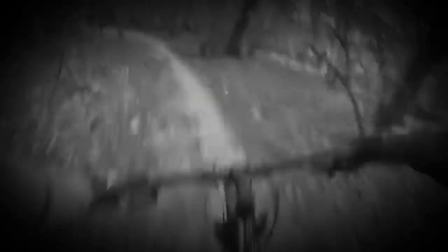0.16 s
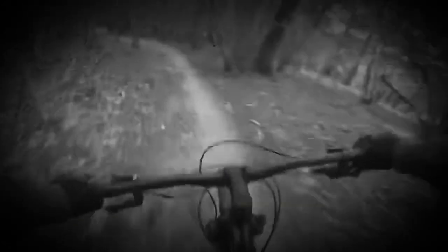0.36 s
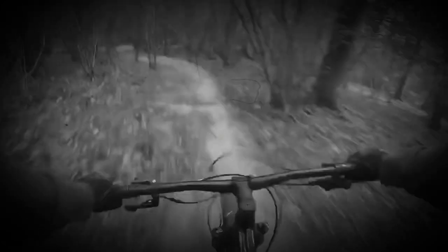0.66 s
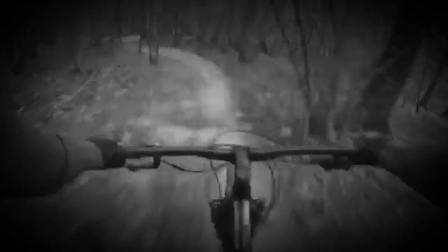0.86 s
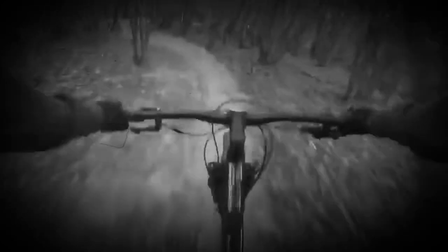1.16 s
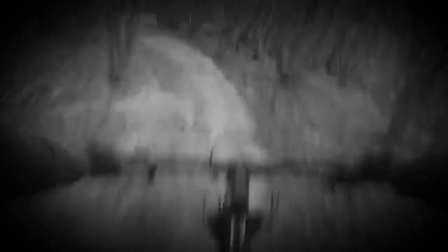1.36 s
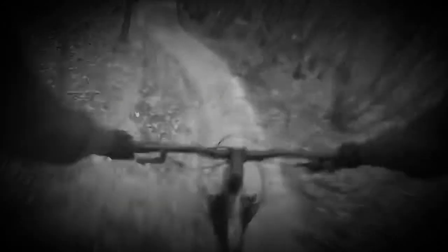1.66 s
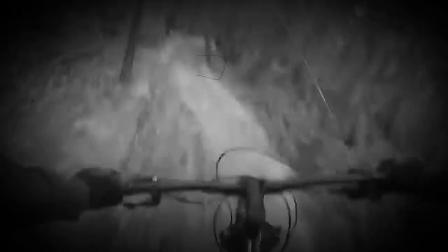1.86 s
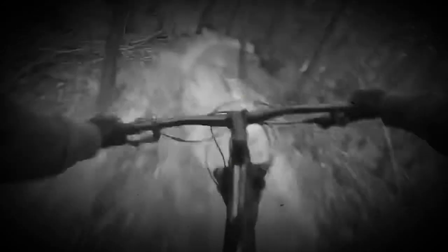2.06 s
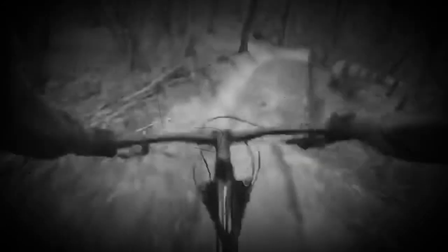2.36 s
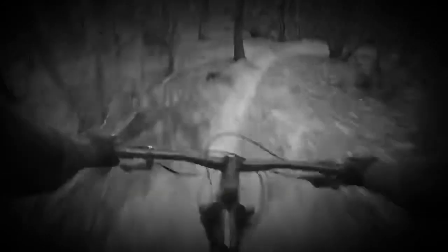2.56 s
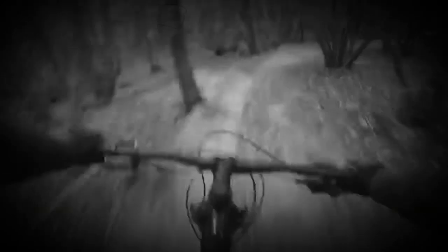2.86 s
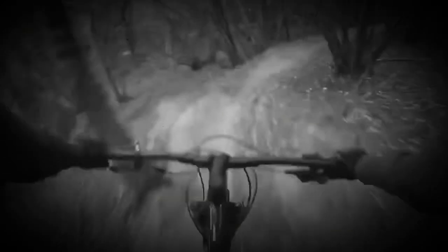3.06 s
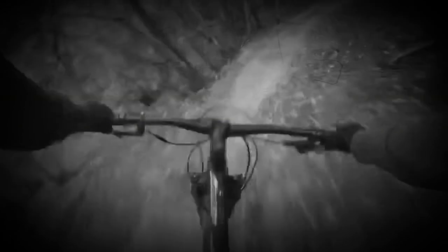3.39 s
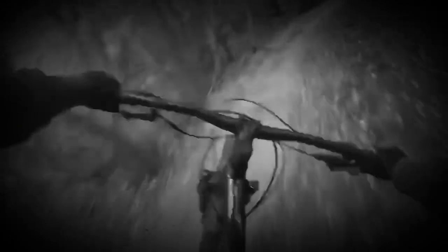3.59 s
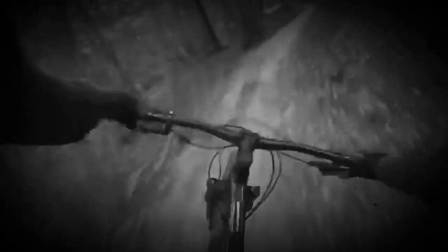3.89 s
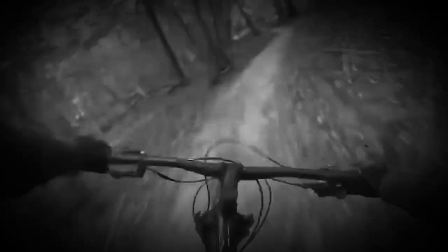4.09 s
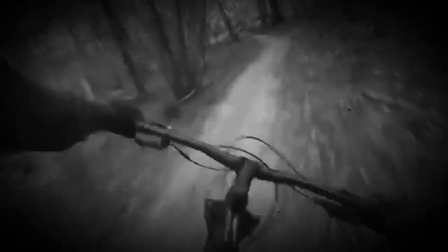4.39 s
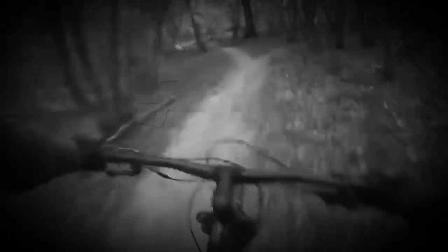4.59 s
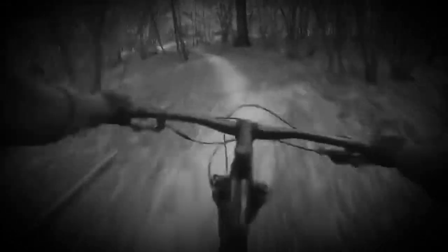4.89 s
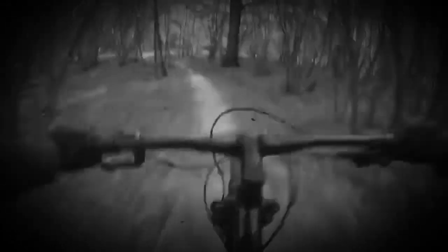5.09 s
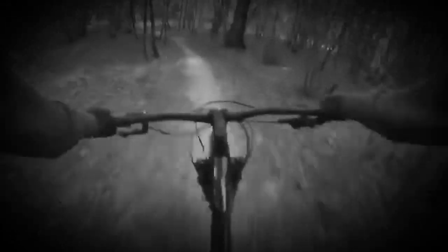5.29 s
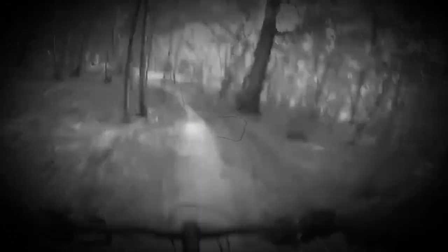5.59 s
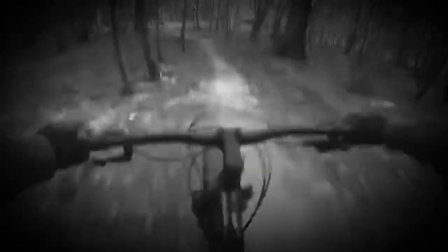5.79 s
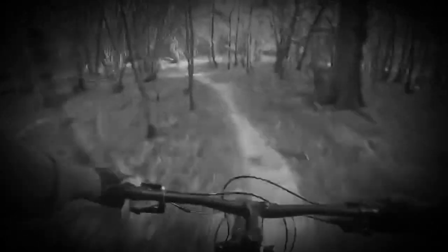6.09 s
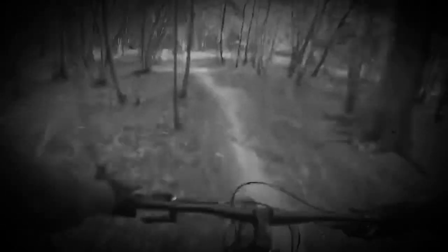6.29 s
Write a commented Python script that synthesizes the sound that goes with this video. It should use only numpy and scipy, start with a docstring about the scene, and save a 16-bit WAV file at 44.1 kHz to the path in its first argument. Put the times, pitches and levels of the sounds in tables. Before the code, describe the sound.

Mounted on a mountain bike outdoors, the microphone catches hard hollow plastic blows at point-blank range, with no echo. They come in uneven clusters, several a second, with brief lulls around the middle. Faint gritty tyre noise, dry leaf hiss and deep shaking run below, swelling on bumps. Late on, a thump, loud double click and harsh grating slip lead into a near-silent hop, then softer landing clacks.

```python
"""A camera rattles in its plastic mount, right at the microphone, on a mountain bike rolling fast down a bumpy
dirt trail. Decaying modes ring the knocks, clicks and hollow clacks; late in the ride the mount slips and
scrapes in shaped grains, then the bike flies for nearly half a second. Below it the tyres hiss and crackle in
noise and grains, louder on bumps and quieter in the air, and low noise and damped pushes carry the rumble."""
import sys
import numpy as np
from scipy import signal
from scipy.fft import rfft, irfft, next_fast_len
from scipy.io import wavfile
from scipy.ndimage import uniform_filter1d, map_coordinates

SR = 44100
rng = np.random.default_rng(int(sys.argv[2]) if len(sys.argv) > 2 else 0)


def wav_out(sig):
    """Save sig, one row per channel (or a flat mono array), as 16-bit PCM at SR to the path in sys.argv[1]."""
    wavfile.write(sys.argv[1], SR, np.round(np.clip(np.atleast_2d(sig).T, -1, 1) * 32767).astype(np.int16))


N = 284430  # length in samples


def amp(db):
    """Decibels to gain."""
    return 10 ** (np.asarray(db) / 20)


def unit(x):
    """Scaled to rms 1."""
    return x / np.sqrt(np.mean(x ** 2) + 1e-20)


def curves(rows):
    """One value per sample for each column after the time, in straight lines between rows."""
    seconds, *columns = np.transpose(rows)
    return [np.interp(np.arange(N) / SR, seconds, column) for column in columns]


def wobble(rate):
    """A smooth random curve through rate knots a second."""
    knots = rng.standard_normal(int(N * rate / SR) + 4)
    return map_coordinates(knots, [np.arange(N) * rate / SR])


def swell(middle, length):
    """A smooth rise to 1 and fall; it stands at 1/e half a length either side of the middle."""
    t = np.arange(N) / SR
    return np.exp(-np.minimum((2 * (t - middle) / length) ** 2, 50))


def filtered(x, response):
    """x times a response of frequency."""
    size = next_fast_len(N + SR // 2)
    hz = np.fft.rfftfreq(size, 1 / SR)
    return irfft(rfft(x, size) * response(hz), size)[:N]


def coloured(x, spectrum):
    """x through (Hz, dB) points joined on a log frequency axis, at rms 1."""
    f, db = np.transpose(spectrum)
    return unit(filtered(x, lambda hz: amp(np.interp(np.log(hz + 1), np.log(f), db))))


def noise(spectrum):
    """Coloured noise of rms 1."""
    return coloured(rng.standard_normal(N), spectrum)


def grains(rate):
    """Tiny impacts at random moments, rate a second on average, of unequal size, at rms 1."""
    size_db = 2.5 * rng.standard_normal(N)
    struck = rng.random(N) < rate / SR
    return unit(struck * rng.standard_normal(N) * amp(size_db))


# The camera drops onto its seat. Each row: start in seconds, level in dB.
KNOCKS = [(0.1035, -26), (0.2183, -12.5), (0.4006, -25), (0.6006, -9), (0.7827, -11.5), (0.9579, -9.5),
          (1.213, -7.5), (1.3405, -11), (1.6396, -6), (1.751, -35.5), (1.9822, -15), (2.138, -15),
          (2.298, -16.5), (2.4392, -17.5), (2.5116, -11.5), (2.6727, -17.5), (2.8395, -13.5), (3.023, -25),
          (3.1047, -19), (3.2701, -19), (3.8604, -29), (4.0379, -24.5), (4.1701, -37), (4.264, -11),
          (4.3487, -7.5), (4.8578, -15), (5.7243, -38), (5.7982, -39), (5.9694, -34.5), (6.2112, -23.5),
          (6.3723, -20.5)]
# The camera hits the opposite stop. Each row: start in seconds, level in dB, hardness in dB per octave.
CLICKS = [(0.0029, -22, -1), (0.0826, -6.5, 4.5), (0.2105, -9, 3.5), (0.3875, -29, -8.5), (1.0337, -2, 0.5),
          (1.2874, -10.5, 2), (1.6968, -6.5, 5), (1.9111, -14, 1.8), (2.0784, -8, -3.5), (2.0852, -9, -5),
          (2.2431, -6, -0.1), (2.3741, -8, -0.2), (2.5989, -19.5, -1.7), (4.3401, -18, -7.5),
          (4.6377, -20.5, -4), (4.8957, -5.5, -0.7), (4.9793, -8, -2.5), (5.5865, -2.5, -3.5),
          (5.6055, -1, -1.5)]
# Glancing blows on the case. Each row: start in seconds, level in dB, hardness in dB per octave.
CLACKS = [(0.5781, -14.5, -3.2), (0.6035, -11.5, 4.5), (0.9347, -7.5, -0.5), (1.5921, -6, 1.5),
          (3.1042, -8.5, 0), (3.9254, -19.5, -3), (4.419, -22.5, -5), (4.4974, -28.5, 0.5),
          (5.1375, -24, -1.5), (5.2037, -13, -3), (5.2624, -21.5, -4.5), (5.4366, -35.5, 5),
          (5.4907, -26, -9.5), (5.6222, -10, 0.5), (5.6355, -11.5, 5), (5.684, -11.5, 3),
          (6.2314, -12, -1.8), (6.3518, -19, 0)]
# Resonances of the seat. Each row: frequency in Hz, level in dB, time to fall 60 dB in seconds.
SEAT_MODES = [(137, -2, 0.023), (250, -6, 0.026), (560, -1, 0.033), (746, -8, 0.042), (980, 0, 0.012),
              (1485, -12, 0.017), (1664, -8, 0.021), (2100, -4, 0.008), (2602, -10, 0.017),
              (3019, -12, 0.011), (4085, -13, 0.016), (5698, -18, 0.009), (8532, -24, 0.001)]
# Resonances of the stop. Each row: frequency in Hz, level in dB, time to fall 60 dB in seconds.
STOP_MODES = [(183, -15.5, 0.015), (1098, -13, 0.025), (1308, 1.5, 0.012), (1490, 2.5, 0.0077),
              (2628, -5, 0.011), (2985, -0.5, 0.0027), (4250, -13, 0.0071), (4750, -17.5, 0.01),
              (5740, -18.5, 0.012), (6310, -25.5, 0.0076), (8540, -23, 0.0042), (10800, -33.5, 0.0055)]
# Resonances of the case. Each row: frequency in Hz, level in dB, time to fall 60 dB in seconds.
CASE_MODES = [(280, 0, 0.006), (614, -6, 0.015), (805, -5, 0.009), (1280, -2, 0.011), (1704, -5, 0.011),
              (2047, -3, 0.008), (2810, -2.5, 0.014), (3761, -17, 0.01), (4343, -10, 0.005),
              (5947, -13, 0.007), (8265, -27, 0.004)]
# The steel clamp screw, shaken by each click. Each row: frequency in Hz, level in dB, time to fall 60 dB in seconds.
SCREW_MODES = [(1100, -46, .07), (1486, -44, .09), (1870, -37, .15), (2690, -44, .12)]
# a stronger knock is brighter: dB per octave at 0 dB, and dB per octave for each dB of level
FULL_HARDNESS, HARDNESS_PER_DB = 1.4, 0.1388


def rattle():
    """The camera bangs about in the play of its mount; glancing blows scuff the most."""
    drops = [(s, db, FULL_HARDNESS + HARDNESS_PER_DB * db) for s, db in KNOCKS]
    stop_and_screw = np.vstack([STOP_MODES, SCREW_MODES])
    knocks = blows(drops, SEAT_MODES, scatter_db=1, detune=0.012, scuff=0.27, soft_hz=7100)
    clicks = blows(CLICKS, stop_and_screw, scatter_db=1.3, detune=0.009, scuff=0.28, soft_hz=10100)
    clacks = blows(CLACKS, CASE_MODES, scatter_db=1, detune=0.0053, scuff=0.45, soft_hz=7000)
    return knocks + clicks + clacks


def blows(events, modes, scatter_db, detune, scuff, soft_hz):
    """Every contact rings the part a little differently."""
    out = np.zeros(N + SR)
    for s, db, hardness in events:
        ringing = ring(modes, hardness, scatter_db, detune)
        blow = amp(db) * signal.fftconvolve(ringing, contact(scuff, soft_hz))
        out[round(s * SR):][:len(blow)] += blow
    return out[:N]


def ring(modes, hardness, scatter_db, detune):
    """Decaying sines of one struck part; a harder blow favours the high modes."""
    hz, db, t60 = np.transpose(modes)[:, :, None]
    t = np.arange(SR // 6) / SR
    size, shift = rng.standard_normal((2, len(modes), 1))
    # neighbouring modes reach the microphone in opposite phase
    polarity = (-1) ** np.arange(len(modes))[:, None]
    octaves = np.log2(np.maximum(hz, 500) / 1000)  # from 1 kHz, no lower than 500 Hz
    level = polarity * amp(db + hardness * octaves + scatter_db * size)
    decay = np.exp(-np.log(1000) * t / t60)
    tones = np.sin(2 * np.pi * hz * (1 + detune * shift) * t)
    return np.sum(level * decay * tones, axis=0)


def contact(scuff, soft_hz):
    """The force of one contact: a tap rounded by the soft plastic, and a scuff as the faces settle."""
    t = np.arange(SR // 100) / SR
    grind = rng.standard_normal(len(t)) * t * np.exp(-t / 0.00093)
    force = (t == 0) + scuff * grind / np.linalg.norm(grind)
    rounding = signal.butter(2, soft_hz, fs=SR)
    return signal.lfilter(*rounding, force / np.linalg.norm(force))


# The camera rubs along the stop without striking it. Each row: middle in seconds, length in seconds, level in dB.
RUBS = [(0.426, 0.014, -41.5), (1.17, 0.014, -35.5), (1.274, 0.014, -26.5), (1.866, 0.015, -37),
        (1.9, .016, -35.5), (2.176, 0.013, -38)]


def rubs():
    """A rub is a short run of tiny slips that ring the stop."""
    strokes = sum(amp(db) * swell(s, length) for s, length, db in RUBS)
    stop = ring(STOP_MODES, -1, scatter_db=1.5, detune=0)
    slips = signal.fftconvolve(grains(rate=4700), stop)[:N]
    return strokes * unit(slips)


# The mount slips under load. Each row: time in seconds, level in dB, share of harsh grating from 0 to 1.
SLIP = [(5.53, -57, 0.5), (5.56, -31.5, 0.46), (5.575, -16.5, 0), (5.59, -18, 0.66), (5.615, -15, 0.99),
        (5.638, -15, 1), (5.648, -49.5, 1), (5.66, -67, .9)]
# Colour of the judder in the slip. Each row: frequency in Hz, level in dB per Hz.
JUDDER = [(180, -56), (300, -25.5), (610, -5.5), (818, -12), (940, -2), (1400, -3.5), (1830, -33.5),
          (2300, -30), (2730, -17), (3330, -30), (4980, -27), (8950, -41), (12000, -53.5), (15600, -84.5),
          (22000, -120)]
# Colour of the grating that takes over. Each row: frequency in Hz, level in dB per Hz.
GRATE = [(120, -48), (200, -10.5), (402, -18.5), (838, -1), (1090, -8), (1410, 3.5), (1780, -8.5),
         (1940, -24.5), (2150, -2), (2650, -1.5), (3000, -17.5), (3270, -7.5), (6580, -22), (10900, -39),
         (13000, -98)]


def slip():
    """The joint slides: dense grains turn from judder to grating, jerk in level and stop short."""
    level_db, harsh = curves(SLIP)
    judder = coloured(grains(rate=5600), JUDDER)
    grate = coloured(grains(rate=6000), GRATE)
    scrape = np.sqrt(1 - harsh) * judder + np.sqrt(harsh) * grate
    jerks_db = 2.8 * wobble(220)
    t = np.arange(N) / SR
    sliding = (t > SLIP[0][0]) & (t < SLIP[-1][0])
    return sliding * amp(level_db + jerks_db) * scrape


# The mount creaks as it flexes. Each row: start in seconds, length in seconds, mean pitch in Hz, level in dB.
CREAKS = [(0.854, 0.019, 377, -29.5), (5.204, 0.027, 658, -29), (5.403, 0.015, 235.6, -37),
          (5.461, 0.04, 295, -29)]


def creaks():
    """Plastic rubs on plastic: short groans of two harmonics at an unsteady pitch."""
    out, t = np.zeros(N), np.arange(N) / SR
    phase_per_hz = 2 * np.pi * np.cumsum(1 + 0.06 * wobble(150)) / SR
    for s, length, hz, db in CREAKS:
        on = (t > s) & (t < s + length)
        phase = hz * phase_per_hz[on]
        groan = np.sin(phase) + 0.17 * np.sin(2 * phase)
        out[on] += amp(db) * np.sin(np.pi * (t[on] - s) / length) * groan
    return out


def chatter(ride_db):
    """Rough ground keeps the case ticking faintly under the big blows."""
    case = ring(CASE_MODES, 0, scatter_db=4.5, detune=0.021)
    ticks = signal.fftconvolve(grains(rate=25), case)[:N]
    return amp(ride_db - 11.5) * unit(ticks)


# Colour of the tread drumming on the ground. Each row: frequency in Hz, level in dB per Hz.
ROAR = [(40, -27.5), (80, 5), (130, -3), (220, -3), (400, -10.5), (600, -14), (1000, -40.5), (2500, -79.5)]
# Colour of crushed dirt. Each row: frequency in Hz, level in dB per Hz.
DIRT = [(250, -18), (500, 2), (700, 2), (900, -0.5), (1170, 4.5), (1450, 2.5), (1900, -1), (2150, 3),
        (2480, -1), (2690, 6.5), (2900, -1.5), (3150, -6.5), (4300, -12.5), (5200, -22), (6100, -9.5),
        (7200, -37.5), (12000, -63.5)]
# Colour of brushed dry leaves. Each row: frequency in Hz, level in dB per Hz.
LEAVES = [(2500, -2), (4200, 0.5), (5200, -2), (6200, -1.5), (7200, -9), (8600, -10.5), (9700, -14.5),
          (11200, -16.5), (12200, -31.5), (14000, -45)]
ROAR_DB, CRUNCH_DB, HISS_DB = 2, -0.5, 1.5  # trims of the three tyre sounds


def tyres(ride_db, leaves_db):
    """Knobbly tyres drum on the ground, crush dirt and brush through dry leaves."""
    ground = wobble(35)  # small unevenness presses the tread harder and softer
    clumps = wobble(140)  # the grit breaks in clumps
    roar_db = ride_db + ROAR_DB + 2.3 * ground
    crunch_db = ride_db + CRUNCH_DB + 1.7 * ground + 1.2 * clumps
    hiss_db = leaves_db + HISS_DB + 1.8 * ground
    roar = amp(roar_db) * noise(ROAR)
    crunch = amp(crunch_db) * coloured(grains(rate=3900), DIRT)
    hiss = amp(hiss_db) * coloured(grains(rate=7000), LEAVES)
    return roar + crunch + hiss


# The wheels leave the ground. Each row: start in seconds, length in seconds, drop in dB.
HOPS = [(0.204, 0.17, 3.5), (1.033, 0.14, 5), (1.692, .12, 3.5), (5.715, 0.44, 11)]
LIFT_S, TOUCH_S = 0.017, 0.026  # time for the tyres to fall quiet, and to grip again


def airborne_db():
    """How far the ground noise has died away while the wheels are in the air."""
    t = np.arange(N) / SR

    def settle(elapsed, time):
        return 1 - np.exp(-np.maximum(elapsed, 0) / time)

    drop_db = np.zeros(N)
    for s, length, db in HOPS:
        lift = settle(t - s, LIFT_S)
        touch = settle(s + length + TOUCH_S - t, TOUCH_S)
        drop_db += db * lift * touch
    return drop_db


# The tyres skid briefly on loose dirt. Each row: middle in seconds, length in seconds, level in dB.
SKIDS = [(0.064, 0.063, -38.5), (0.56, 0.16, -45), (0.716, 0.012, -35.5), (0.858, 0.035, -34.5),
         (0.888, 0.024, -34.5), (0.957, 0.072, -47.5), (1.134, 0.013, -40), (1.177, 0.046, -42.5),
         (1.22, 0.023, -36), (1.28, 0.012, -33.5), (1.588, 0.039, -33.5), (1.673, 0.041, -29.5),
         (2.221, 0.032, -39.5), (2.712, 0.034, -47), (3.061, 0.033, -40.5), (3.345, 0.094, -40.5),
         (3.89, 0.045, -40.5), (4.23, 0.026, -47), (4.501, 0.019, -38.5), (5.21, 0.057, -37),
         (5.272, 0.066, -38.5), (5.531, 0.24, -41.5), (5.68, 0.036, -42.5), (6.286, .05, -48.5)]
BUMP_S, BUMP_DB = 0.024, -29  # the bump behind each knock: its length, and its grit against the knock
SKID_ROAR_DB, SKID_HISS_DB = 0.5, -12  # against the grit of a skid


def skids():
    """Each skid, and each bump that knocks the camera, is a short swell of crushed grit, roar and hiss."""
    slides = sum(amp(db) * swell(s, length) for s, length, db in SKIDS)
    bumps = sum(amp(db + BUMP_DB) * swell(s, BUMP_S) for s, db in KNOCKS)
    grit = coloured(grains(rate=3100), DIRT)
    roar = amp(SKID_ROAR_DB) * noise(ROAR)
    hiss = amp(SKID_HISS_DB) * noise(LEAVES)
    return (slides + bumps) * (grit + roar + hiss)


# Twigs and dry leaves flick against the spokes. Each row: start in seconds, level in dB.
TWIGS = [(0.841, -39), (1.408, -38), (1.816, -45.5), (3.005, -35), (3.014, -38), (3.09, -46)]
# Colour of a flick. Each row: frequency in Hz, level in dB per Hz.
FLICK = [(2000, -25.5), (4000, 3), (6200, 4), (9000, -3), (11500, -23), (14000, -33)]


def twigs():
    """Each flick is a very short, bright crackle of grains that falls 60 dB in 28 ms."""
    t = np.arange(N) / SR
    bursts = sum(amp(db - 60 * np.abs(t - s) / 0.028) * (t > s) for s, db in TWIGS)
    return bursts * coloured(grains(rate=4300), FLICK)


# The wheels slam into bumps. Each row: start in seconds, level in dB before a 6 dB lift, pitch in Hz.
THUDS = [(0.518, -15.5, 49.6), (0.654, -24, 85), (0.993, -10.5, 49.3), (1.195, -7, 44.4), (1.656, -21, 130),
         (1.696, -15, 110), (2.16, -27.5, 91.3), (4.079, -29, 84), (4.676, -30.5, 172), (5.122, -26, 104),
         (5.593, -8, 79.5), (5.63, -11, 96)]


def thuds():
    """A hard bump gives one low, quickly damped push."""
    out, t = np.zeros(N + SR), np.arange(SR // 8) / SR
    onset = 1 - np.exp(-t / 0.0037)
    for s, db, hz in THUDS:
        decay = amp(db + 6.0 - 60 * t / 0.034)
        out[round(s * SR):][:len(t)] += decay * onset * np.sin(2 * np.pi * hz * t)
    return out[:N]


# Colour of the steady shaking. Each row: frequency in Hz, level in dB per Hz.
SHAKE = [(8, -12.5), (16, 6), (26, -1), (45, -6.5), (70, -15), (110, -16.5), (200, -71.5), (400, -120)]
# The bike swings through a dip or a turn. Each row: middle in seconds, length in seconds, level in dB.
SWAYS = [(0.06, 0.15, -21.5), (0.296, 0.087, -28), (0.734, 0.083, -24), (0.994, 0.23, -23.5),
         (1.247, .2, -23), (1.673, 0.11, -27), (2.638, 0.095, -27.5), (3.382, 0.16, -17.5),
         (4.018, .06, -26.5), (4.281, .12, -27.5), (4.82, 0.12, -20.5), (5.562, 0.14, -21.5)]
# Colour of the swings. Each row: frequency in Hz, level in dB per Hz.
SWAY = [(8, -21), (18, 9), (32, 1), (50, -12.5), (75, -18), (130, -43.5), (300, -120)]
SHAKE_DB = 16  # the steady rumble, against the ride level


def rumble(ride_db):
    """Jolts and air shake the camera: a lumpy rumble that follows the trail, and deeper swells as the bike swings."""
    def even(sway):
        """Holds the noise near a steady level over each tenth of a second."""
        power = np.abs(uniform_filter1d(sway ** 2, size=SR // 10))
        return sway / np.sqrt(power + 1e-3)

    jolts_db = 2.2 * wobble(22)
    shaking = amp(ride_db + SHAKE_DB + jolts_db) * even(noise(SHAKE))
    swings = sum(amp(db) * swell(s, length) for s, length, db in SWAYS)
    return shaking + swings * even(noise(SWAY))


# How hard the tyres work, before trims and hops.
# Each row: time in seconds, level on the dirt in dB, level of the leaf hiss in dB.
RIDE = [(0.0, -48, -55), (0.21, -52, -60.5), (0.42, -51, -56), (0.58, -47.5, -54.5), (0.76, -45.5, -54),
        (1.15, -45, -56.5), (1.52, -47.5, -53.5), (1.73, -55.5, -61.5), (1.87, -50, -63.5),
        (2.31, -47.5, -61), (2.58, -47.5, -54), (2.79, -48, -57), (3.32, -50, -57.5), (3.66, -50, -64),
        (4.34, -48.5, -56.5), (4.52, -51.5, -60.5), (5.22, -48, -59), (5.45, -54, -62)]


def scene():
    """The rattle right at the microphone, the ride below it."""
    ride_db, leaves_db = np.array(curves(RIDE)) - airborne_db()
    mount = rattle() + rubs() + slip() + creaks() + chatter(ride_db)
    ride = tyres(ride_db, leaves_db) + skids() + twigs() + thuds() + rumble(ride_db)
    return (mount + ride)[None]


ROLL_OFF_HZ, TOP_HZ = 12600, 13950  # where the treble is 3 dB down, and where it ends


def record(dry):
    """The camera rounds off peaks near full scale, dulls the top and keeps nothing outside its band."""
    rounded = dry[0] / (1 + np.abs(dry[0]) ** 6) ** (1 / 6)
    dulled = filtered(rounded, lambda hz: 1 / np.sqrt(1 + (hz / ROLL_OFF_HZ) ** 20))
    return filtered(dulled, lambda hz: (hz > 5) & (hz < TOP_HZ))[None]


dry = scene()
out = record(dry)
wav_out(out)
```